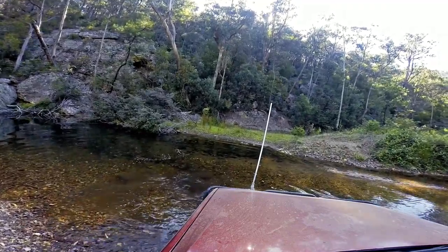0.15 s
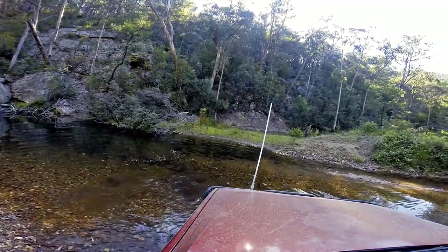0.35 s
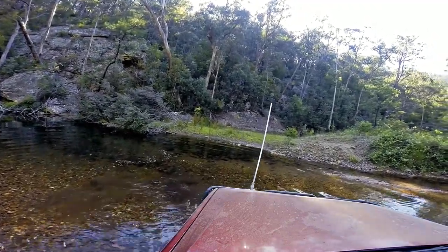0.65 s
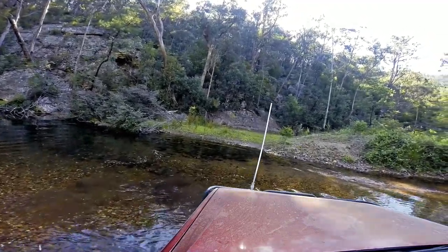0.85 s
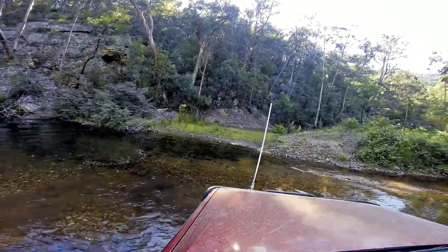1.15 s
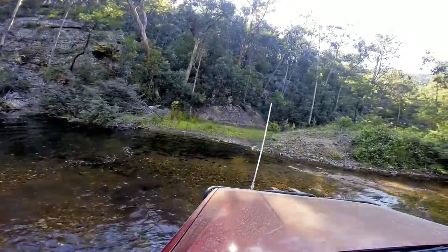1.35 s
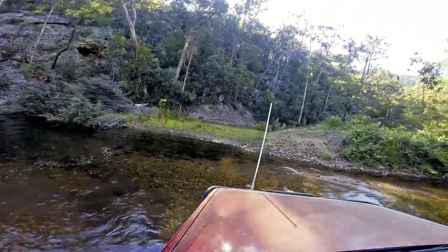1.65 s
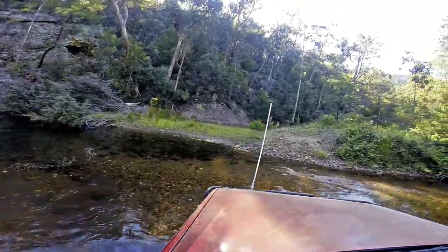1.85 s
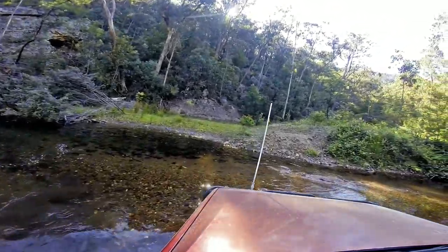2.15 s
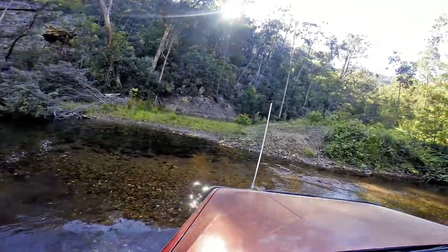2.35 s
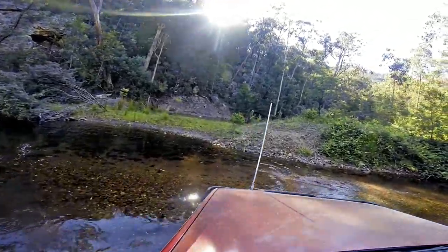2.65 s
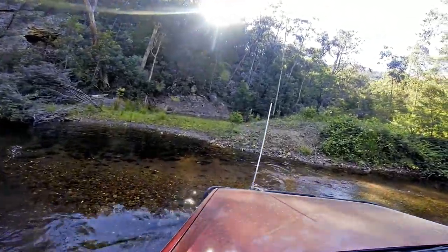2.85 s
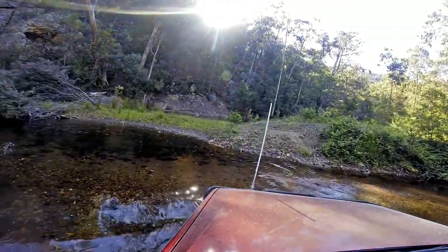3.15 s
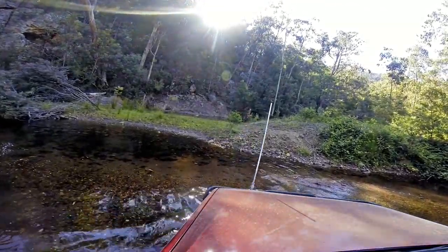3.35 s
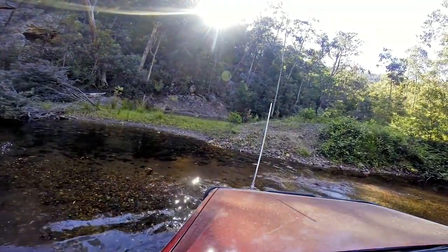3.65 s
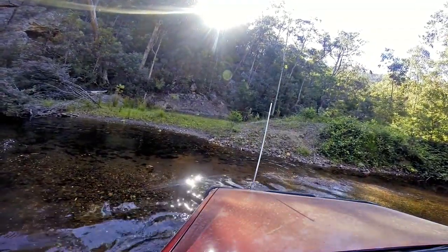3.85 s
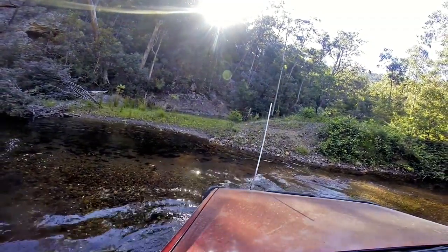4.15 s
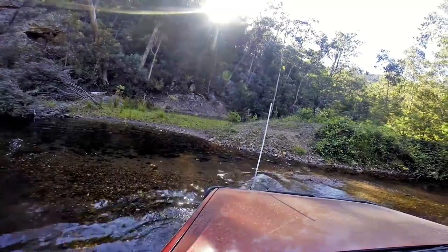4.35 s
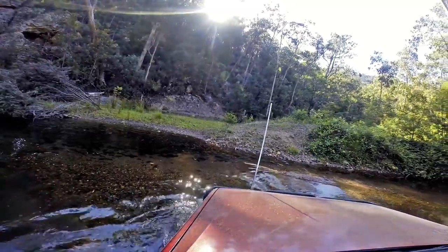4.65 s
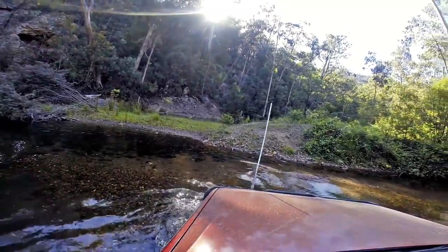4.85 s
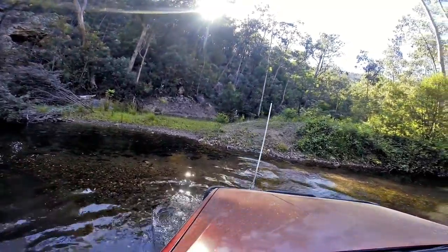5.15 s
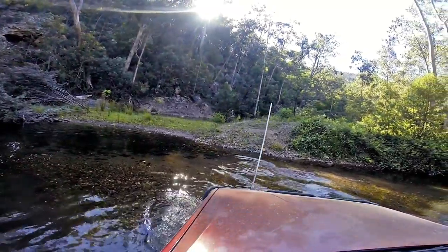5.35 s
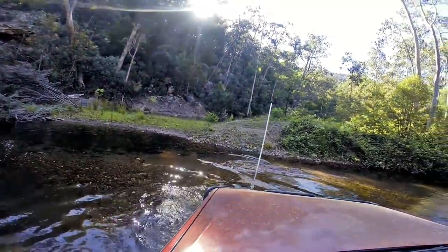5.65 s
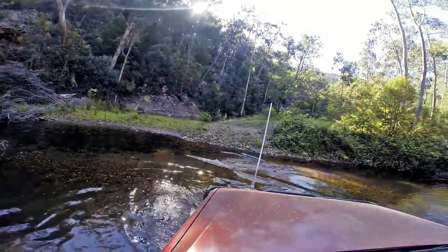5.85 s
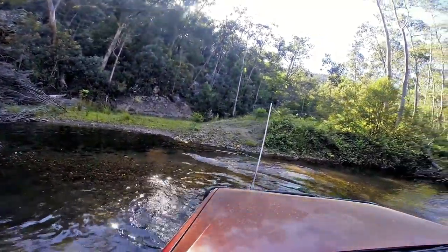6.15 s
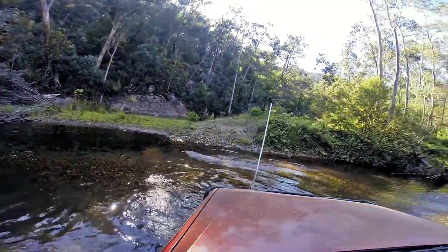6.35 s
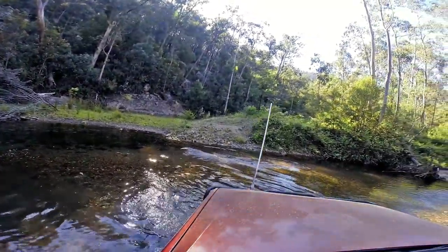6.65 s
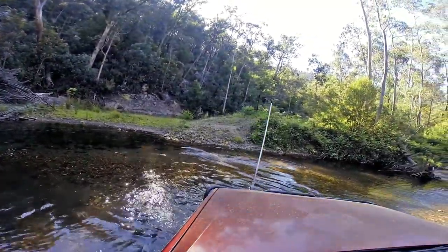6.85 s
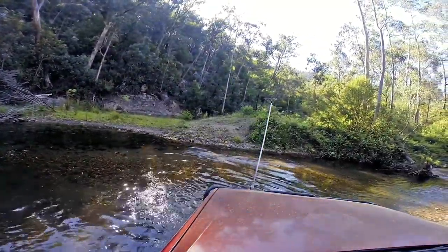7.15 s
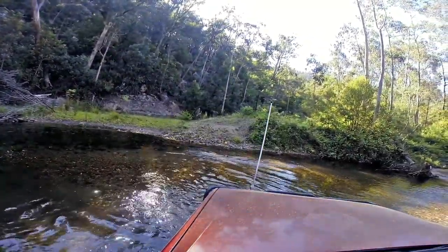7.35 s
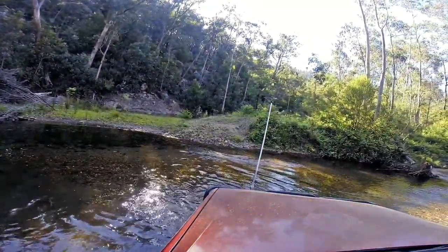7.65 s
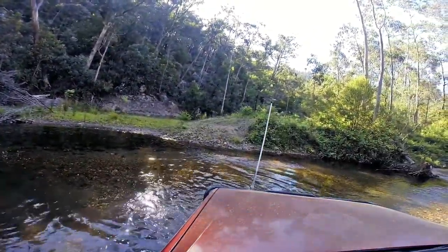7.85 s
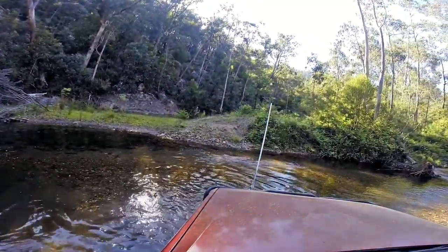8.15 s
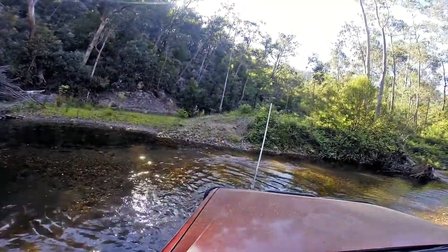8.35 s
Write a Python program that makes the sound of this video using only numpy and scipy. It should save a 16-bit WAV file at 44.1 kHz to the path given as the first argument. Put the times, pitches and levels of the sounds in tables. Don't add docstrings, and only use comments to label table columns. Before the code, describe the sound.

Low rumbling vehicle fords a rocky stream, with dull underbody thumps, a heavy bump midway and another near the end, water slapping faintly.

```python
import sys
import numpy as np
from scipy import signal
from scipy.fft import rfft, irfft
from scipy.io import wavfile

SR = 44100
rng = np.random.default_rng(int(sys.argv[2]) if len(sys.argv) > 2 else 0)


def wav_record(signal):
    frames = np.transpose(np.atleast_2d(signal))
    bounded = np.clip(frames, -1, 1)
    quanta = np.round(bounded * 32767).astype(np.int16)
    wavfile.write(sys.argv[1], SR, quanta)


def ratio_of_db(decibels):
    return 10 ** (np.asarray(decibels, float) / 20)


N = 374850

# [peak_s, level_db, pitch_hz, half_length_s]
WHEEL_LURCHES = [(0.0, -34, 44.9, .08), (0.472, -36.5, 44.9, 0.22), (0.952, -32.5, 45.2, 0.11),
                 (1.285, -29, 42.6, 0.063), (1.47, -31.5, 43.2, 0.066), (1.68, -32, 42.1, 0.27),
                 (2.072, -31.5, 45, 0.16), (2.36, -29, 45.57, 0.11), (2.52, -27.5, 45, 0.098),
                 (3.047, -31.5, 45.53, 0.2), (3.404, -20, 44.87, 0.053), (3.528, -29.5, 46.36, .03),
                 (3.639, -34, 47.44, .04), (3.787, -26, 41.04, .04), (3.863, -12, 42.9, 0.073),
                 (4.116, -27, 43.1, 0.046), (4.291, -26.5, 43.56, 0.067), (4.485, -30, 42.85, 0.032),
                 (4.643, -30.5, 41.1, .05), (4.79, -25, 42.6, 0.073), (4.997, -38, 43.77, 0.18),
                 (5.52, -32, 44, .07), (5.762, -26.5, 44.73, 0.15), (5.955, -25, 44.9, .13),
                 (6.33, -26, 46.1, 0.15), (7.002, -37.5, 45.33, .12), (7.345, -25, 43.44, .04),
                 (7.442, -25, 43.73, 0.079), (7.932, -17, 43.35, 0.085), (8.406, -32.5, 44.8, 0.054)]


def evened(x):
    return x / np.sqrt(np.mean(x ** 2) + 1e-20)


def noise():
    return rng.standard_normal(N)


def curves(rows):
    s, *columns = np.transpose(rows)
    return [np.interp(np.arange(N) / SR, s, column) for column in columns]


def add(mix, start_s, sound):
    part = mix[round(start_s * SR):][:len(sound)]
    part += sound[:len(part)]


def drift(rate_hz):
    return evened(signal.sosfilt(signal.butter(2, rate_hz, fs=SR, output="sos"), noise()))


def coloured(x, points):
    f, db = np.transpose(points)
    hz = np.fft.rfftfreq(len(x), 1 / SR)
    gain_db = np.interp(np.log(hz + 1), np.log(f + 1), db, -90, -90)
    return evened(irfft(rfft(x) * ratio_of_db(gain_db), len(x)))


def orders(turn_hz, table, wobble_db):
    angle = 2 * np.pi * np.cumsum(turn_hz) / SR
    out = np.zeros(N)
    for multiple, db in table:
        level = ratio_of_db(db + wobble_db * drift(4.0))
        out += level * np.sqrt(2) * np.sin(multiple * angle + 2 * np.pi * rng.random())
    return out


def ring(db, hz, t60_s, rise_s):
    t = np.arange(SR // 4) / SR
    decay = ratio_of_db(db - 60 * t / max(t60_s, .01))
    return decay * (1 - np.exp(-t / rise_s)) ** 2 * np.sin(2 * np.pi * hz * t)


def bursts(rows, colour):
    gate = np.zeros(N)
    for start_s, db, length_s in rows:
        u = np.arange(SR // 5) / SR / max(length_s, .004)
        add(gate, start_s, ratio_of_db(db) * np.minimum(6 * u, 1) * np.exp(-u ** 2))
    return gate * coloured(noise(), colour)


def swell():
    idle_db, rise_share, fall_share, edge_power = -39.5, 0.99, 1.1, 1.9
    t = np.arange(0, N / SR + .01, .002)
    power = ratio_of_db(idle_db) ** 2
    for peak_s, db, _, half_s in WHEEL_LURCHES:
        u = (t - peak_s) / (max(half_s, .01) * np.where(t < peak_s, rise_share, fall_share))
        power = power + (ratio_of_db(db) * np.exp(-abs(u) ** edge_power)) ** 2
    return np.interp(np.arange(N) / SR, t, np.sqrt(power))


def boom():
    flutter_db, flutter_hz, clean_level = 3.5, 7.3, 0.051
    hz, size = curves(WHEEL_LURCHES)[1], swell()
    size = size * ratio_of_db(flutter_db * drift(flutter_hz) / (1 + size / clean_level))
    angle = 2 * np.pi * np.cumsum(hz * (1 + 0.029 * drift(7.5))) / SR
    wave = np.sin(angle) + 0.08 * np.cos(2 * angle) - 0.08 * np.sin(3 * angle)
    return size * np.sqrt(2) * wave


def chassis():
    # [level_db, bed_share, rattle_per_boom, unrest_db]
    parts = [
        (-43, 1, 6.4, 1.9),
        (-39.5, 0.64, 1.3, 1.1),
        (-51, 0.21, 5.9, 2.05),
    ]
    # [freq_hz, density_db]
    frame_colour = [(30, -24), (45, -2), (58, 7), (75, -0.5), (92, 4.5), (110, -5.5), (130, 1), (170, -5.5)]
    panel_colour = [(90, -9), (125, -12.5), (150, -1), (185, -1), (210, -3), (235, -18.5), (300, -23.5)]
    floor_colour = [(190, -30), (240, 5), (270, -4.5), (292, 3), (325, -5), (380, -15.5), (430, -12),
                    (520, -36.5), (650, -34)]
    sway_colour = [(6, -34), (12, -8), (20, 4), (30, 3), (36, -3.5), (48, -29)]
    # [time_s, level_db]
    bed = [(0, 0.5), (.5, -0.5), (1.2, -2.5), (1.75, 2.5), (2.4, 3.5), (2.7, 1.5), (3.1, -4), (3.85, 3),
           (4.2, 2), (4.4, 4), (5.15, -4), (5.5, 3.5), (5.75, -2.5), (6.3, -2.5), (7.2, -0.7), (7.46, 5),
           (7.65, -2.5), (8.5, 0.7)]
    bed_db, = curves(bed)
    lurch = swell()
    sway = ratio_of_db(-44.5 + 1.7 * drift(2.7)) * (1 + 5.5 * lurch)
    out = sway * coloured(noise(), sway_colour)
    for (db, share, rattle, unrest_db), colour in zip(parts, (frame_colour, panel_colour, floor_colour)):
        level = ratio_of_db(db + share * bed_db + unrest_db * drift(3.25))
        out += level * (1 + rattle * lurch) * coloured(noise(), colour)
    return out


def rocks():
    # [start_s, level_db, ring_hz, upper_level_db]
    knocks = [(2.988, -21.5, 158.5, -20), (2.991, -27.5, 335, -27), (3.211, -27, 180.2, -40),
              (3.392, -23, 171.2, -33), (3.496, -29, 186, -26.5), (3.735, -25, 200, -25.5),
              (3.762, -19, 150.2, -21), (3.777, -20, 165.9, -23), (3.80, -19, 169, -20),
              (3.83, -18.5, 149.4, -26), (3.879, -21, 134, -35), (4.571, -36, 189, -31),
              (6.966, -23.5, 154.5, -32), (7.163, -23.5, 241.2, -25), (7.316, -31.5, 197, -25),
              (7.345, -26, 251.5, -33), (7.359, -30, 190.3, -27), (7.39, -36, 195.3, -30.5),
              (7.43, -28, 223, -43), (7.519, -26.5, 160, -35), (7.82, -24.5, 212.2, -37),
              (7.87, -32, 170, -34), (7.925, -23.5, 220, -32), (8.059, -16, 200, -20.5),
              (8.085, -22.5, 185, -40)]
    # [start_s, level_db, ring_hz, t60_s]
    pings = [
        (3.49, -47, 2100, 0.073),
        (3.492, -54, 2220, .05),
        (3.757, -55, 4140, 0.11),
        (3.797, -48, 1530, .07),
        (2.8, -58, 4300, .04),
        (2.993, -55, 2080, 0.046),
        (7.32, -51, 1470, 0.054),
        (7.408, -57, 2830, 0.039),
    ]
    # [start_s, level_db, ring_hz, t60_s]
    drops = [
        (3.347, -27, 77.1, 0.31),
        (3.74, -24, 80, .15),
        (3.82, -17, 29, .24),
        (7.315, -28, 27, 0.2),
        (7.805, -20, 70.6, 0.18),
        (7.81, -27, 29, 0.19),
    ]
    out = np.zeros(N)
    for start_s, db, hz, upper_db in knocks:
        upper_hz = hz + 111
        add(out, start_s, ring(db + 8.5, hz, 12.1 / hz, 0.0042))
        add(out, start_s, ring(upper_db + 5.0, upper_hz, 14.3 / upper_hz, 0.003))
    for start_s, db, hz, t60_s in pings + drops:
        add(out, start_s, ring(db + 4.0, hz, t60_s, .002))
    return out


def engine():
    # [time_s, shaft_hz, joint_load_db]
    shaft = [(0, 18.7, -37), (.4, 19.1, -38), (.7, 19.3, -43), (1.5, 21.6, -42), (1.9, 20.1, -43),
             (2.2, 23.3, -31.5), (2.5, 23.5, -46), (3.1, 21.7, -41), (3.5, 20, -40), (4, 20.5, -40),
             (4.45, 26.5, -27.5), (4.62, 24.8, -33.5), (4.85, 21.5, -45), (5.35, 20.8, -49),
             (5.6, 22.8, -34.5), (6.2, 24.3, -34), (6.55, 18.1, -56), (8.5, 21.2, -56)]
    # [time_s, level_db]
    grip = [(0, -48.5), (.75, -37.5), (2, -41), (3.1, -49.5), (4, -40.5), (4.25, -57), (4.5, -41.5),
            (5.35, -44), (5.9, -53), (8.5, -53)]
    # [multiple, level_db]
    crank_orders = [(2, -47.5), (7, -49.5), (8, -48), (9, -50.5), (10, -50.5), (12, -42), (14, -55.5)]
    throb_orders = [(3, -4), (6, -10.5)]
    tread_orders = [(5, -10), (9, -7.5), (10, -2)]
    fan_orders = [(7.8, -69.5), (8.75, -68.5), (9.02, -72.5), (10, -71.5)]
    # [centre_hz, width_hz, level_db]
    hums = [(611, 20, -73), (624.4, 8, -69.5), (712, 28, -71), (758, 27, -73), (967, 9.1, -77.5),
            (1143, 19, -72.5), (1348, 22, -75.5), (1415, 14, -70), (1457, 81, -69), (1950, 150, -77.5),
            (4480, 500, -78)]
    crank_hz, fan_hz = 15.05, 78.3
    shaft_hz, throb_db = curves(shaft)
    tread_db, = curves(grip)
    out = orders(crank_hz * (1 + 0.0041 * drift(1.72)), crank_orders, 1.6)
    out += ratio_of_db(throb_db) * orders(shaft_hz, throb_orders, 0.6)
    out += ratio_of_db(tread_db) * orders(shaft_hz * (1 + .004 * drift(6.)), tread_orders, 2.)
    out += orders(fan_hz * (1 + .004 * drift(.7)), fan_orders, 3.)
    hz = np.fft.rfftfreq(N, 1 / SR)
    for centre_hz, width_hz, db in hums:
        peak = 1 / (1 + (2 * (hz - centre_hz) / width_hz) ** 2)
        out += ratio_of_db(db) * evened(irfft(peak * rfft(noise()), N))
    return out


def spits():
    # [start_s, length_s, level_db]
    showers = [
        (3.427, .19, -66),
        (5.03, .28, -66.5),
        (6.975, .19, -67),
    ]
    gap_s, spit_s, spread_db = .034, .02, 2
    rows = []
    for start_s, length_s, db in showers:
        late, size = rng.standard_normal((2, 12))
        after_s = gap_s * (np.arange(12) + .12 * late)
        for a, b in zip(after_s, size):
            if a < length_s:
                rows.append((start_s + a, db + spread_db * b, spit_s))
    return rows


def water():
    # [time_s, level_db]
    wash = [(0, -58.5), (.8, -59), (1.5, -56.5), (2, -58), (2.4, -55.7), (2.8, -58.5), (3.7, -60),
            (3.8, -54.5), (3.95, -58.5), (4.8, -56.5), (5.3, -59), (6.05, -56), (6.3, -58), (6.7, -60),
            (7.45, -58.5), (7.7, -58), (8, -58), (8.5, -60.5)]
    # [start_s, level_db, length_s]
    slaps = [
        (2.99, -62, .015),
        (3.735, -57, 0.029),
        (3.765, -53, 0.039),
        (3.80, -54, 0.047),
        (5.885, -53, .02),
        (6.02, -55, 0.045),
        (7.165, -59, 0.022),
        (7.315, -51, 0.028),
        (7.35, -61, 0.057),
        (7.405, -55, 0.017),
    ]
    # [freq_hz, density_db]
    wash_colour = [(190, -29), (330, -2.5), (500, -9), (697, -11), (846, -13), (1250, -14.5), (1430, -12),
                   (1660, -19.5), (2000, -20), (3000, -29.5), (3900, -60), (6600, -120)]
    fizz_colour = [(1200, -36), (2000, -4), (3000, -5), (4300, -8), (5100, -9.5), (5800, -10), (8200, -17),
                   (10500, -20), (11300, -23.5), (12200, -24), (14000, -21.5), (15500, -29)]
    slap_colour = [(500, -18), (900, 4.5), (1500, 5.5), (2500, -5.5), (4600, -7), (5200, -20.5),
                   (7000, -32)]
    spray_colour = [(5000, -14), (8500, -6), (9700, -2), (10600, -15), (11800, -19), (13200, -6),
                    (14200, -11), (15500, -18)]
    level_db, = curves(wash)
    flicker_db = .5 * drift(25.)
    body = ratio_of_db(level_db + 4.0 + flicker_db) * coloured(noise(), wash_colour)
    popping = rng.random(N) < 900 / SR
    grains = noise() + 1.03 * noise() * popping * rng.exponential(1, N)
    fizz_db = -64.5 + 0.38 * (level_db - level_db.mean())
    fizz = ratio_of_db(fizz_db + flicker_db) * coloured(grains, fizz_colour)
    return body + fizz + bursts(slaps, slap_colour) + ratio_of_db(-4.5) * bursts(spits(), spray_colour)


def brake():
    # [time_s, pitch_hz, level_db]
    squeal = [
        (2.67, 7746, -94),
        (2.796, 7730, -67),
        (2.892, 7723, -67),
        (2.922, 7757, -86),
        (2.93, 7754, -75),
        (2.988, 7716, -71),
        (3.23, 7730, -90),
        (3.244, 7700, -80),
        (3.28, 7720, -90),
    ]
    releases = [
        2.785,
        2.822,
        2.862,
        2.917,
        3.028,
        3.08,
    ]
    hz, db = curves(squeal)
    t = np.arange(N) / SR
    contact = ((t > squeal[0][0]) & (t < squeal[-1][0])).astype(float)
    for release_s in releases:
        contact *= 1 - .9 * np.exp(-((t - release_s) / 0.0056) ** 2)
    return ratio_of_db(db + 1.5) * contact * np.sqrt(2) * np.sin(2 * np.pi * np.cumsum(hz) / SR)


def sensor():
    # [row_rate_multiple, level_db]
    whine = [(1, -88), (2, -78), (3, -77.5), (4, -82), (5, -88)]
    frame_hz, rows_per_frame, clock_per_frame = 30000 / 1001, 97.665, 187.8
    place = np.arange(N) / SR * frame_hz % 1
    rows = np.zeros(N)
    for multiple, db in whine:
        rows += ratio_of_db(db) * np.sqrt(2) * np.sin(2 * np.pi * multiple * rows_per_frame * place)
    angle = 2 * np.pi * clock_per_frame * place + .5 * drift(30.)
    clock = ratio_of_db(-81) * np.sin(angle) + ratio_of_db(-84) * np.sin(2 * angle)
    return (place < .9) * rows + clock * np.exp(-((place - .5) / 0.36) ** 2)


def scene():
    ease = np.minimum(np.arange(N)[::-1] / (.004 * SR), 1)
    mix = boom() + chassis() + rocks() + engine() + water() + brake()
    return (mix * ease)[None]


def low_pass(x):
    return signal.sosfilt(signal.butter(12, 14930, fs=SR, output="sos"), x)


def record(dry):
    return low_pass(dry + sensor())


dry = scene()
out = record(dry)
wav_record(out)
```